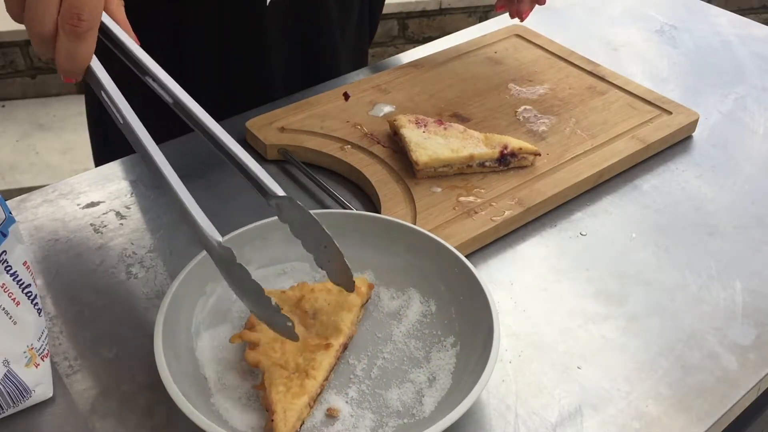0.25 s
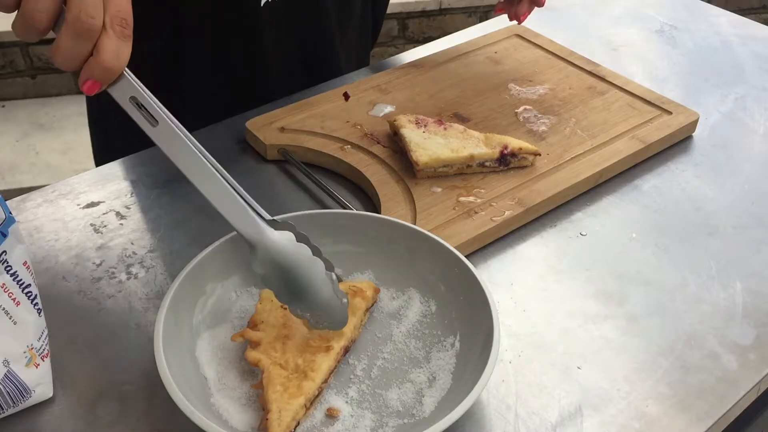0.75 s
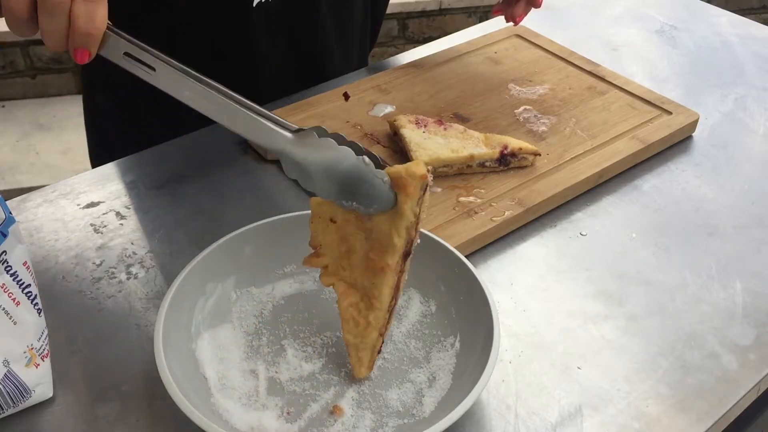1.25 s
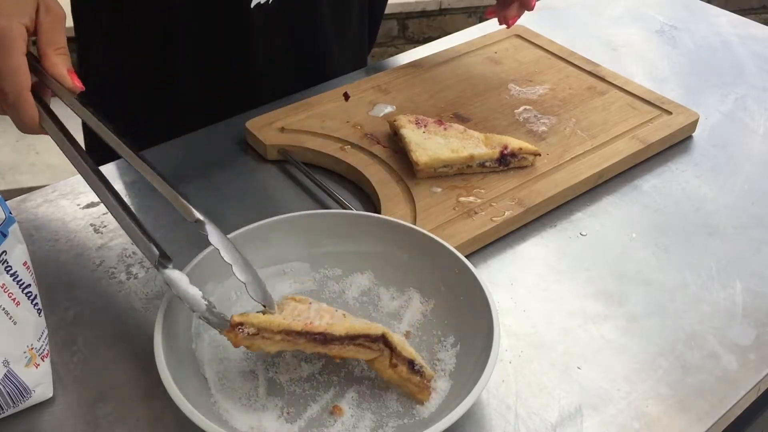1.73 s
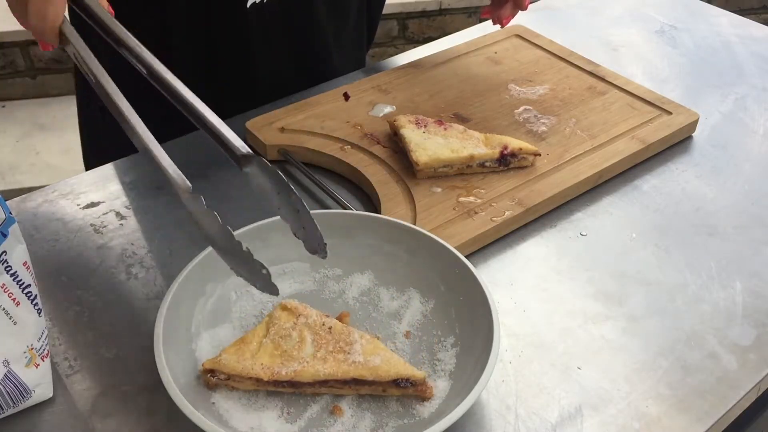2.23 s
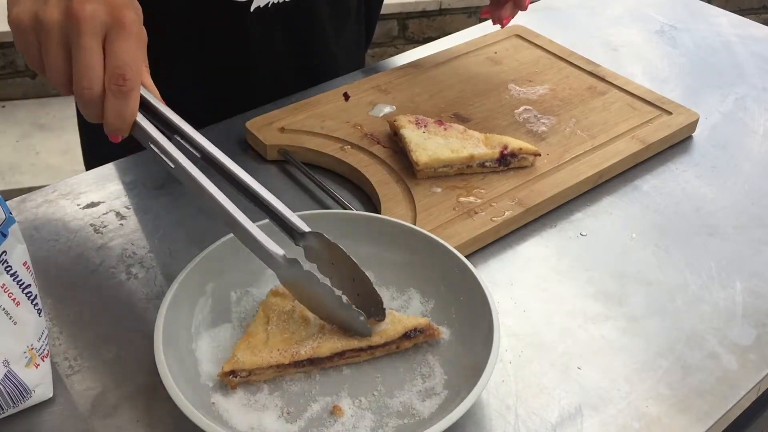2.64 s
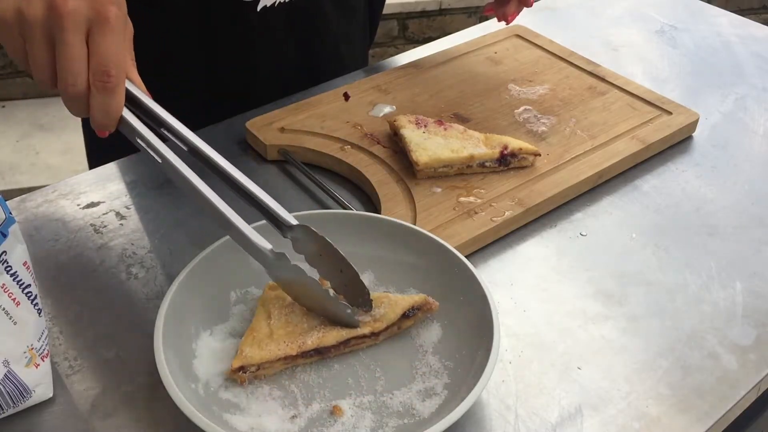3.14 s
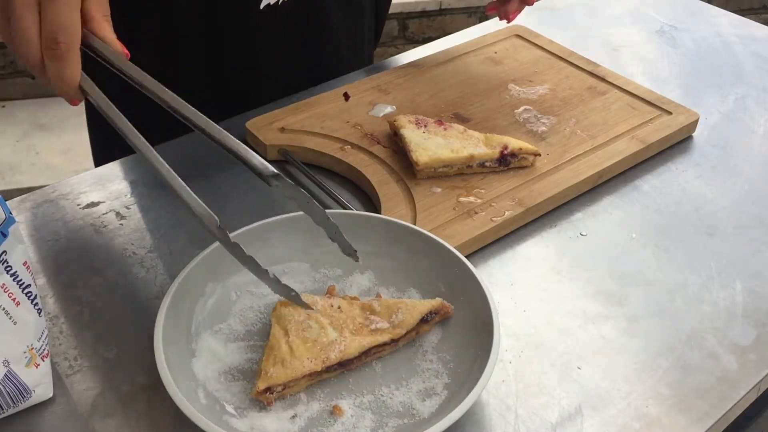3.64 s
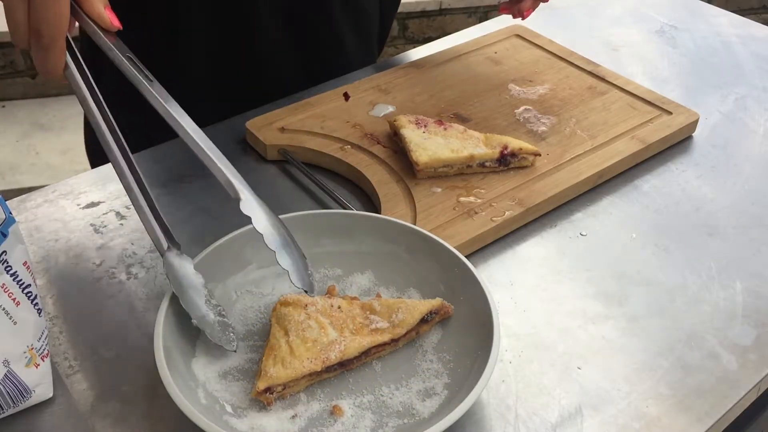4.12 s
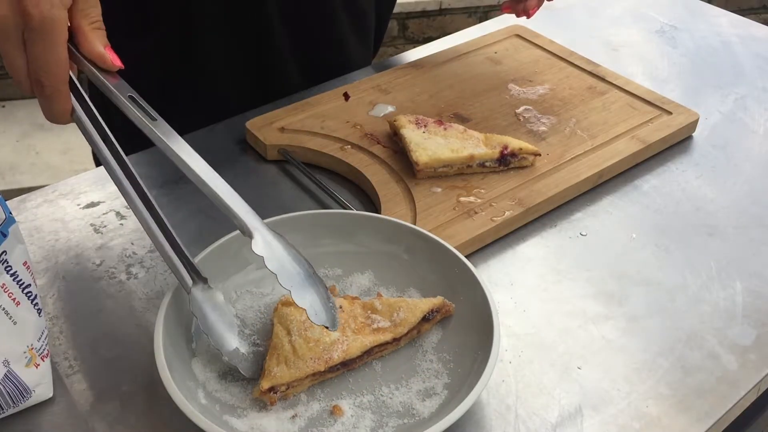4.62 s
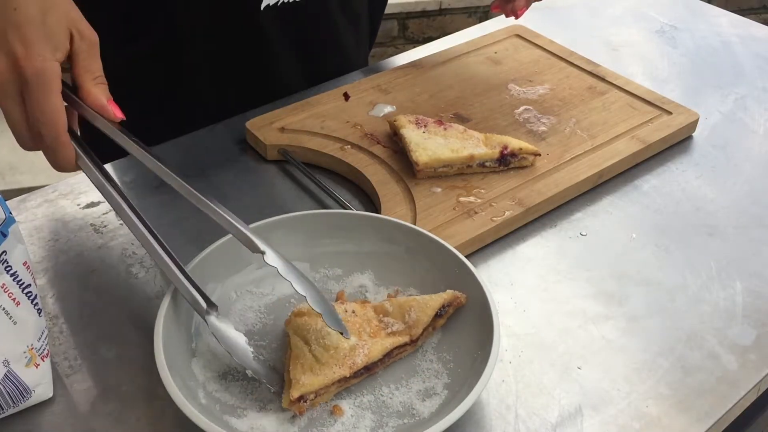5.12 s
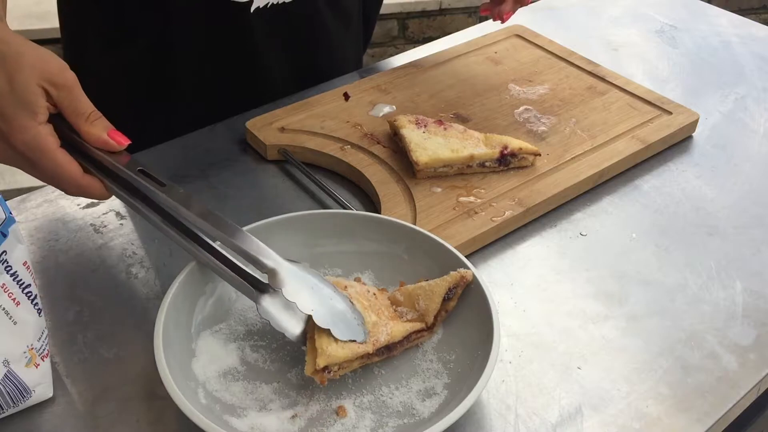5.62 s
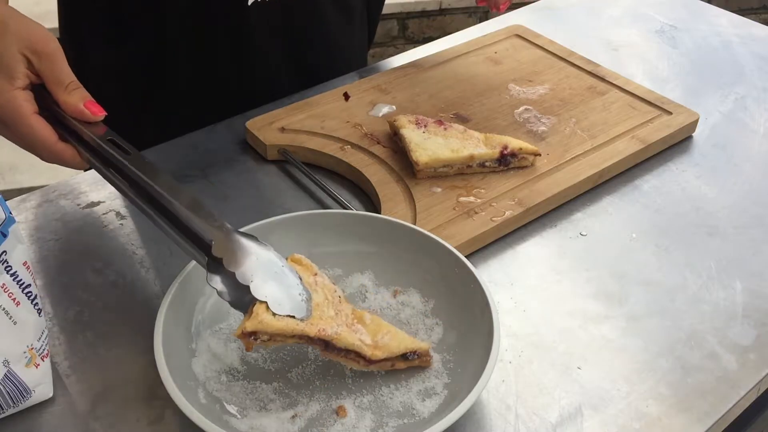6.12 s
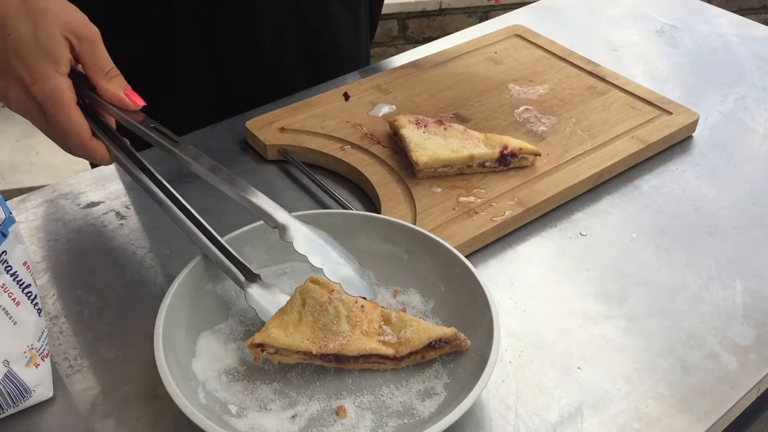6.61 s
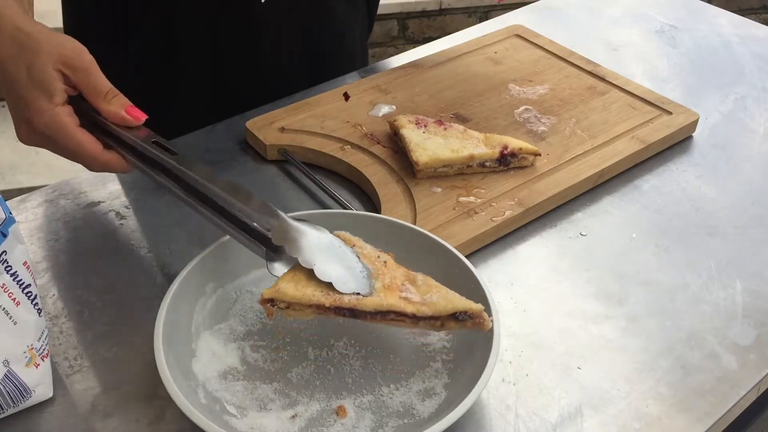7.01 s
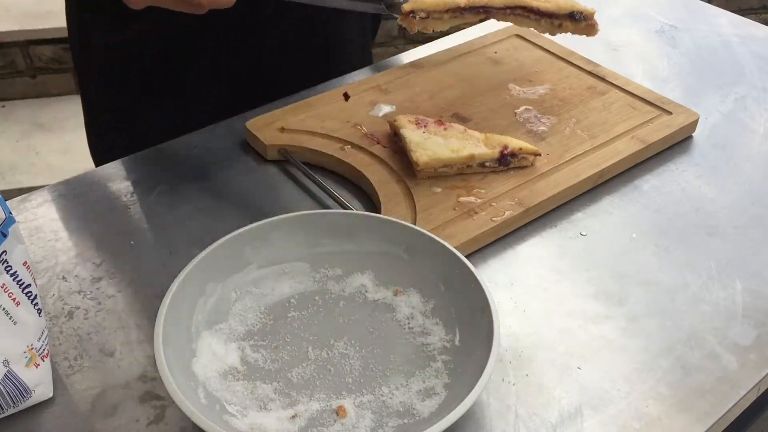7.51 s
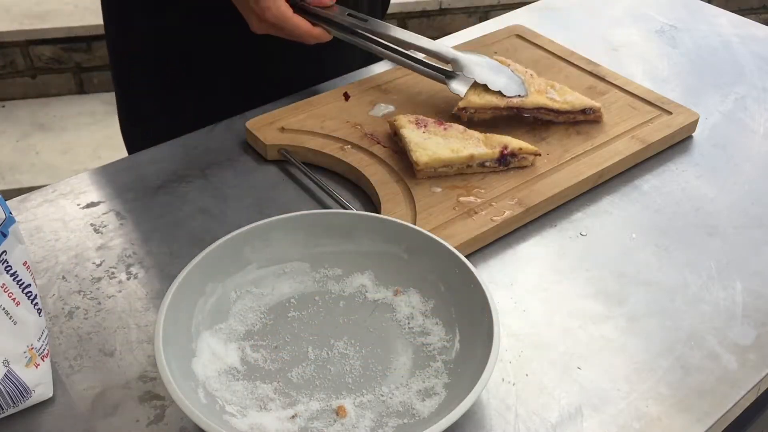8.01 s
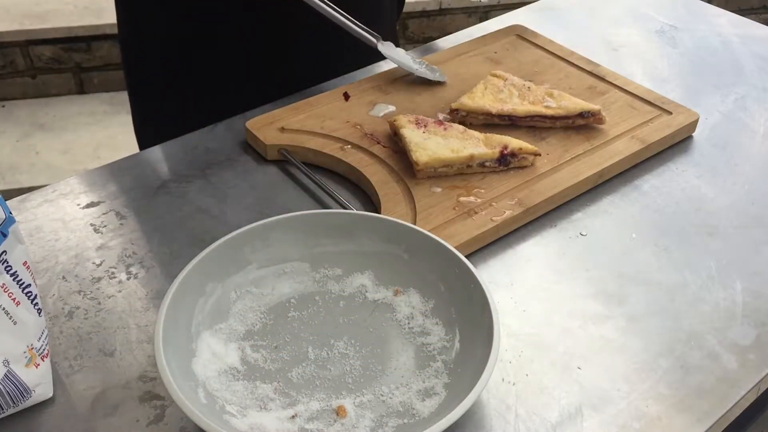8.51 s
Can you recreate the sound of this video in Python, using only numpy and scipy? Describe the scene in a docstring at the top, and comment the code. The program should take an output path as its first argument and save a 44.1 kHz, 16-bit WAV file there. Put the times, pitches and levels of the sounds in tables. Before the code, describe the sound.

Outdoors, with traffic humming far away, a close microphone picks up the soft fizz of sugar and small crackles as fried bread is moved around a ceramic bowl. The steel table bumps dully. Metal tongs clink on the bowl, the bread rubs through the sugar again, and then come gritty scrapes and knocks, ending with a hard clack and scrape heard twice.

```python
"""Close microphone on a ceramic bowl on a sheet-steel table, walls nearby, traffic humming far off.
First fried bread slides through granulated sugar, its crust crackling, and the table booms softly.
Near 2 s steel tongs ring the bowl; a long push through the sugar follows. From 4 s the tongs knock
and scrape the glaze, hardest at 6.4 s, and two faint hoots come from the distance.
From 7.3 s that last stroke loops once more."""
import sys
import numpy as np
from scipy import signal
from scipy.fft import rfft, irfft, next_fast_len
from scipy.io import wavfile
from scipy.ndimage import uniform_filter1d, map_coordinates

SR = 44100
rng = np.random.default_rng(int(sys.argv[2]) if len(sys.argv) > 2 else 0)


def generate_wav(sig):
    """Save sig (samples, or channels by samples) to the path in sys.argv[1] as 16-bit PCM at SR."""
    pcm = np.round(np.clip(np.atleast_2d(sig).T, -1, 1) * 32767).astype(np.int16)
    wavfile.write(sys.argv[1], SR, pcm)


N = 385875

# far traffic (frequency [Hz], spectral level [dB])
TRAFFIC_SPECTRUM = [(13, -50), (22, -12), (81, -5.5), (170, -11), (287, -15.5), (572, -16), (800, -17),
                    (1630, -30), (3000, -34.5), (8000, -37.5), (16200, -47)]
# far engine (frequency [Hz], width [Hz], level [dB])
ENGINE_PEAKS = [(78.6, 7.1, -1.5), (173.6, 7.6, -1), (251.7, 15, -6), (333, 21, -10)]
# far hoots (time [s], level [dB], pitch [Hz], t60 [s])
FAR_HOOTS = [(7.164, -40.5, 812, 0.16), (7.233, -41, 783, 0.13)]
# sheet-steel table top (frequency [Hz], width [Hz], level [dB])
TABLE_MODES = [(126, 7.4, 0.5), (222.6, 13, 4), (304.7, 60, -5.5), (510, 67, -2.5)]
# soft bumps on the table (time [s], level [dB])
TABLE_BUMPS = [(0.306, -26), (0.345, -27), (0.706, -31), (1.431, -31), (2.356, -31.5), (6.975, -36.5),
               (7.12, -36)]
# crust and sugar lumps breaking (time [s], level [dB], band centre [Hz])
CRUST_BREAKS = [(0.333, -45, 2640), (0.7796, -46.5, 5100), (0.902, -44, 3400), (0.913, -50, 3500),
                (0.97, -41, 5660), (1.0395, -48, 4300), (1.09, -48, 3500), (1.122, -36.5, 5820),
                (1.2027, -44, 4230), (1.241, -44.5, 2800), (1.281, -44, 5740), (1.3655, -49, 6960),
                (1.4088, -44, 6800), (1.472, -39.5, 6100), (1.561, -42.5, 4000), (1.6155, -43, 4940),
                (1.63, -33, 4100), (1.639, -26, 5080), (2.4494, -36.5, 6150), (2.4647, -39.5, 8000),
                (2.4986, -40, 9190), (2.8005, -39, 6060), (2.975, -38.5, 6500), (4.3067, -35, 9000),
                (4.3167, -21, 5430), (5.188, -34, 4200), (5.7, -43, 4600), (5.7644, -39.5, 4290),
                (6.321, -48.5, 5330), (6.7994, -38, 9190), (7.0529, -49, 8250), (7.066, -48, 3500),
                (7.21, -56.5, 8130)]
# bread sliding in sugar (peak time [s], level [dB], rise [s], hold [s], fall [s])
BREAD_SLIDES = [(0.0, -45, .01, 0.011, 0.52), (0.257, -57.5, 0.145, .03, 0.033),
                (0.323, -60.5, .03, 0.04, 0.1025), (0.955, -49.5, 0.17, 0.012, 0.21),
                (1.21, -56.5, 0.036, 0.022, 0.24), (1.48, -54.5, 0.068, 0.24, 0.3),
                (2.354, -69, 0.013, .005, 0.038), (2.466, -44, 0.019, 0.0055, 0.18),
                (2.7, -49.5, .35, .88, .15), (2.95, -55, .2, 0.023, .25), (4.335, -54, 0.013, .005, 0.095),
                (4.878, -47, 0.19, 0.0066, 0.012), (5.39, -49, 0.068, 0.076, .01),
                (5.963, -60.5, 0.73, .05, 0.087), (6.374, -56, .012, .005, 0.02),
                (6.93, -69, .02, 0.062, 1)]
# contact noises (frequency [Hz], spectral level [dB])
FIZZ_SPECTRUM = [(710, -72), (1200, -14.5), (1750, -6), (2430, -0.5), (3150, -4.5), (4170, -0.5),
                 (8000, -5), (14700, -18.5), (16000, -32.5)]  # sugar grains
RUB_SPECTRUM = [(120, -25), (250, -17.5), (450, 3.5), (800, -4), (1500, -7), (2400, -29.5)]  # bread on glaze
GRIT_SPECTRUM = [(150, -48), (600, -11.5), (1300, -0.5), (1800, -3.5), (2800, -8.5), (5000, -6),
                 (9000, -17), (16000, -39.5)]  # steel on sugar
CRACK_SPECTRUM = [(300, -34), (1000, -6), (2000, -7), (4500, -4.5), (9000, -3), (12000, -22.5),
                  (16000, -33)]  # first touch of a knock
# bowl modes (frequency [Hz]) and, row for row, (level [dB], free t60 [s])
BOWL_MODE_HZ = [741, 1631, 2746, 4097, 5620, 7330, 9195, 11230]
BOWL_MODES = [(-7.5, 0.19), (-5.5, 0.45), (-9, 0.39), (-18, 0.23), (-22, 0.3), (-20.5, 0.085),
              (-29.5, 0.061), (-31, 0.055)]
# tongs modes (frequency [Hz]) and, row for row, (struck level [dB], free t60 [s], rubbed level [dB])
TONGS_MODE_HZ = [1066, 1560, 1900, 2190, 2425, 2492, 2575, 2830, 3320, 3470, 4130, 4170, 4215, 5310, 5790,
                 6090, 6380, 7360, 8230, 9230, 11290, 13500]
TONGS_MODES = [(-5, 0.22, -9.5), (3.5, 0.1, -9), (2.5, 0.05, -2), (-14.5, 0.055, -3), (-1, 0.088, 1.5),
               (-2, 0.076, -3), (-15, 0.058, -4.5), (-4.5, 0.089, -1.5), (-9, 0.027, -5),
               (-13.5, 0.15, -15.5), (0.5, 0.1, 13.5), (10, 0.042, -4.5), (-14, 0.027, -12.5),
               (-19, 0.07, -20), (-1, 0.043, -7.5), (-18, 0.054, -14), (-16, .1, -17.5), (-22.5, 0.14, 4.5),
               (-18.5, 0.046, -11), (-8.5, 0.12, -1.5), (-22.5, 0.075, -10.5), (-37.5, .15, -15)]
# tong tips dragged on the glaze (peak time [s], level [dB], rise [s], fall [s],
# then relative to that level: bowl [dB], steel at 3.8-7 kHz [dB], steel above 7 kHz [dB])
TIP_DRAGS = [(1.888, -46, 0.0059, 0.033, 14, -9, -10), (1.96, -49, 0.041, 0.17, 4, -17, -4),
             (2.05, -48, 0.12, 0.22, -11, -11, -12), (4.03, -58, .01, .04, -17, 7, -9),
             (4.104, -41, 0.048, 0.019, -9, -6, -4.5), (4.18, -48, 0.078, .06, -8, -2, -6),
             (4.29, -60.5, 0.041, 0.089, 3, 6, -2), (4.872, -34.5, .008, 0.017, -12, -1.5, -5.5),
             (4.93, -46.5, .02, .2, -5, -5, -19), (4.993, -31.5, 0.018, 0.053, -3.5, 1.5, -2.5),
             (5.022, -30.5, .02, .09, -12, -5, -21), (5.125, -34.5, .015, 0.086, -3.5, -11, -24),
             (5.471, -26, 0.0052, 0.091, -7, -7, -24), (5.64, -59.5, 0.13, 0.077, -12, -8, -11),
             (6.399, -31.5, .015, 0.051, -10, -4.5, -27), (6.64, -41, .2, 0.26, -4, -2, -18),
             (6.744, -36.5, 0.14, 0.17, -8, -7, -13), (6.794, -40.5, 0.15, 0.073, -11, -9, -10),
             (6.84, -47, 0.093, 0.069, -10, -12, -17)]
# knocks on the bowl: first the bread's soft thud, then the tongs; the final row is a faint tick
# where the last stroke starts to repeat (time [s], crack [dB], bowl ring [dB], tongs ring [dB],
# thump [dB], bowl freedom [share of free t60], hardness [dB/octave])
BOWL_KNOCKS = [(0.7083, -20.5, -51, -68, -30.5, 1, -6), (1.513, -31, -53, -69.5, -50, 0.7, -4.5),
               (1.7677, -39, -50, -47, -48, 0.7, 1), (1.8772, -14.5, -9.5, -44, -26.5, 0.14, 7),
               (2.0023, -30, -27.5, -50, -47, 0.7, 6), (2.0384, -24.5, -24.5, -62.5, -55, 1, 4.5),
               (2.0745, -23.5, -19, -56.5, -55, 0.85, 6.5), (2.0879, -21, -39.5, -52, -45, 0.53, -6.5),
               (2.1061, -36, -31.5, -65.5, -40.5, 0.6, 8.5), (4.0087, -19.5, -12, -28, -33, 0.1, 8),
               (4.0254, -44.5, -64, -37.5, -63, 0.4, 6), (4.3207, -60, -19, -60, -68, 0.75, 7),
               (4.9008, -14.5, -49, -22, -37.5, 0.9, 8), (5.0163, -26, -33, -29, -37, 0.8, 6),
               (5.1621, -37, -26.5, -59.5, -41, 0.87, 2), (5.4618, -11.5, -10, -19.5, -30.5, 0.08, 5),
               (5.7326, -30, -36, -29, -37.5, 1, 1), (6.3784, 0.5, -48, -10, -20.5, 0.67, 7),
               (6.8811, -48.5, -44, -39, -42.5, 1, -1), (7.312, -62, -58, -67, -66, 0.9, 0)]


def amp(db):
    """Gain of a level in dB."""
    return 10 ** (np.asarray(db) / 20)


def unit(x):
    """x at rms 1."""
    return x / np.sqrt(np.mean(x ** 2) + 1e-20)


def filtered(x, response):
    """x through a complex frequency response."""
    size = next_fast_len(len(x) + 8192)
    return irfft(rfft(x, size) * response(np.fft.rfftfreq(size, 1 / SR)), size)[:len(x)]


def noise(length, response):
    """Filtered noise at rms 1."""
    return unit(filtered(rng.standard_normal(length), response))


def colour(points):
    """Response through (frequency [Hz], level [dB]) points on a log axis."""
    freqs, db = np.transpose(points)
    return lambda hz: amp(np.interp(np.log(hz + 1), np.log(freqs + 1), db))


def resonances(peaks):
    """Causal response of (frequency [Hz], width [Hz], level [dB]) peaks of alternating sign."""
    return lambda f: sum((-1) ** k * amp(db) * 1j * f * width / (hz * hz - f * f + 1j * f * width)
                         for k, (hz, width, db) in enumerate(peaks))


def wobble(rate):
    """A smooth random curve, rate knots a second."""
    return map_coordinates(rng.standard_normal(int(N * rate / SR) + 4), [np.arange(N) * rate / SR])


def grains(rate, spread_db, clump_db):
    """Tiny impulses of uneven size that come in clumps, rms 1."""
    impulses = (rng.random(N) < rate / SR) * rng.standard_normal(N)
    return unit(impulses * amp(spread_db * rng.exponential(size=N) + clump_db * wobble(60)))


def patchy(x, depth_db):
    """x with soft random swells, each over a part of the spectrum."""
    spectra = signal.stft(x, nperseg=512)[2]
    swells = uniform_filter1d(rng.standard_normal(spectra.shape), size=16, axis=0)
    swells = uniform_filter1d(swells, size=9, axis=1)
    return signal.istft(spectra * amp(depth_db * unit(swells)), nperseg=512)[1][:N]


def stroke(at, db, rise, fall, hold=0):
    """Gain of one stroke: it gains 20 dB in the rise, holds, and loses 20 dB in the fall."""
    t = np.arange(0, N, 16) / SR - at
    gain = amp(db + 20 * np.minimum(0, np.minimum(t / rise, (hold - t) / fall)))
    return np.repeat(gain, 16)[:N]


def add(track, at, sound):
    """Mix a sound into the track at a time in seconds."""
    part = track[round(at * SR):][:len(sound)]
    part += sound[:len(part)]


def tones(events, attack_s):
    """Single damped tones with a soft start."""
    out, t = np.zeros(N), np.arange(SR // 2) / SR
    for at, db, hz, t60 in events:
        add(out, at, amp(db - 60 * t / t60) * (1 - np.exp(-t / attack_s)) * np.sin(2 * np.pi * hz * t))
    return out


def ringing(modes_hz, modes, t, tilt, freedom):
    """Modes set off together at chance phases; a touch (freedom below 1) shortens them all."""
    hz = np.array(modes_hz)[:, None]
    db, t60 = np.transpose(modes)[:, :, None]
    phase = 2 * np.pi * rng.random(hz.shape)
    decay = amp(db + tilt(hz) - 60 * t / (t60 * freedom))
    return np.sum(decay * np.sin(2 * np.pi * hz * t + phase), axis=0)


def street(traffic_db=-52, engine_db=-55):
    """Far off: traffic that swells a little, an engine's unsteady drone and two hoots."""
    traffic = amp(traffic_db + 0.7 * wobble(2.4)) * noise(N, colour(TRAFFIC_SPECTRUM))
    engine = amp(engine_db) * noise(N, resonances(ENGINE_PEAKS))
    return traffic + engine + tones(FAR_HOOTS, attack_s=0.0083)


def yard_echo(near, level_db=-12, t60=0.17):
    """Nearby walls and the table top send a short diffuse answer to the microphone."""
    t = np.arange(SR // 4) / SR
    tail = noise(len(t), colour([(200, 3.0), (4000, -11.5), (14000, -9.5)])) * amp(-60 * t / t60)
    delayed = np.pad(tail / np.linalg.norm(tail), (130, 0))  # 3 ms late
    return amp(level_db) * signal.fftconvolve(near, delayed)[:N]


def table_bumps(hz=115, t60=0.23):
    """Under the bowl, the steel sheet booms softly when bumped."""
    return tones([(at, db, hz, t60) for at, db in TABLE_BUMPS], attack_s=0.0092)


def thump(t, hz=410, width_hz=500, t60=0.058):
    """The loaded bowl answers with a dull burst of noise."""
    return amp(-60 * t / t60) * noise(len(t), resonances([(hz, width_hz, 0)]))


def crunches(t60=0.048, thump_db=-12.5):
    """Crust and sugar lumps break: each a wide band of crackle over a small thump."""
    out, t = np.zeros(N), np.arange(SR // 12) / SR
    # faint chance crackles while the bread is gripped and lifted
    crumbs = [(0.8 + when, -49 + 8 * (size - 0.5), 4450 * 2 ** (1.8 * (pitch - 0.5)))
              for when, size, pitch in rng.random((9, 3)) * [1.05, 1, 1]]
    for at, db, hz in CRUST_BREAKS + crumbs:
        crackle = rng.standard_normal(len(t)) * amp(4 * rng.standard_normal(len(t)))
        band = unit(filtered(crackle, lambda f: resonances([(hz, 0.85 * hz, 0)])(f) ** 2))
        envelope = amp(db - 60 * t / t60) * (1 - np.exp(-t / 0.0013))
        add(out, at, envelope * band + amp(db + thump_db) * thump(t))
    return out


def sugar(rub_db=-4, hum_db=-15):
    """Dense crystals fizz under the bread, with a duller rub below; the bowl hums along faintly."""
    level = sum(stroke(at, db, rise, fall, hold) for at, db, rise, hold, fall in BREAD_SLIDES)
    crystals = patchy(grains(7000, spread_db=1.2, clump_db=1.0), depth_db=2.0)
    fizz = unit(filtered(crystals, colour(FIZZ_SPECTRUM)))
    rub = unit(filtered(grains(2500, spread_db=1.5, clump_db=1.5), colour(RUB_SPECTRUM)))
    t = np.arange(SR // 8) / SR
    bowl = ringing(BOWL_MODE_HZ, BOWL_MODES, t, lambda hz: 3 * np.log2(hz / 3000), freedom=0.22)
    hum = unit(signal.oaconvolve(fizz, bowl)[:N])
    return level * (fizz + amp(rub_db) * rub + amp(hum_db) * hum)


def scrapes(low_steel_db=-5.5, grit_db=-8):
    """Sugar crystals crushed under the steel tips kick tongs and bowl at random."""
    drags = np.array([stroke(*row[:4]) for row in TIP_DRAGS])
    level = drags.sum(axis=0)
    bowl_gain, middle_gain, shimmer_gain = amp(np.array(TIP_DRAGS)[:, 4:].T) @ drags
    kicks = grains(6000, spread_db=2, clump_db=2)
    t, rubbed = np.arange(SR // 4) / SR, np.array(TONGS_MODES)[:, [2, 1]]

    def steel(low_hz, high_hz, freedom):
        """The rubbed tongs ringing within one band."""
        band = lambda hz: -99 * ((hz < low_hz) | (hz > high_hz))
        return ringing(TONGS_MODE_HZ, rubbed, t, band, freedom)

    low = steel(0, 3800, freedom=0.44)
    middle = steel(3800, 7000, freedom=0.4)
    shimmer = steel(7000, SR, freedom=0.95)  # the dragging tip barely damps these
    bowl = ringing(BOWL_MODE_HZ, BOWL_MODES, t, lambda hz: 5 * np.log2(hz / 3000), freedom=0.25)
    parts = [(amp(low_steel_db) * level, low), (middle_gain, middle),
             (shimmer_gain, shimmer), (bowl_gain, bowl)]
    rings = sum(signal.oaconvolve(gain * kicks, body / np.linalg.norm(body))[:N] for gain, body in parts)
    grit = unit(filtered(kicks, colour(GRIT_SPECTRUM)))
    return rings + amp(grit_db) * level * grit


def knocks(crack_t60=0.01, push_db=40.5):
    """Right at the microphone, each knock cracks, rings bowl and tongs and pushes the table."""
    out, pushes, t = np.zeros(N), np.zeros(N), np.arange(SR // 3) / SR
    struck = np.array(TONGS_MODES)[:, :2]
    attack = 1 - np.exp(-t / 0.00077)
    for at, crack_db, bowl_db, tongs_db, thump_db, freedom, hardness in BOWL_KNOCKS:
        tilt = lambda hz: hardness * np.log2(hz / 3000) + 0.52 * rng.standard_normal(hz.shape)
        bowl = amp(bowl_db) * ringing(BOWL_MODE_HZ, BOWL_MODES, t, tilt, freedom)
        tongs = amp(tongs_db) * ringing(TONGS_MODE_HZ, struck, t, tilt, freedom=0.33)  # hand-damped
        crack = amp(crack_db - 60 * t / crack_t60) * noise(len(t), colour(CRACK_SPECTRUM))
        add(out, at, attack * (bowl + tongs + crack + amp(thump_db) * thump(t)))
        pushes[round(at * SR)] = amp(thump_db + push_db)
    return out + filtered(pushes, resonances(TABLE_MODES))


def scene():
    """The bowl up close, its echo, the table beneath and the street far behind, in mono."""
    near = knocks() + scrapes() + sugar() + crunches()
    return (near + yard_echo(near) + table_bumps() + street())[None]


def record(dry, bass_hz=35, top_hz=16300):
    """The microphone drops deep bass, the hardest blow clips, the last stroke loops; the top is cut."""
    thinned = filtered(dry[0], lambda hz: (1j * hz / (bass_hz + 1j * hz)) ** 2)
    clipped = thinned / (1 + np.abs(thinned) ** 6) ** (1 / 6)
    loop_at, loop_from = 322631, 257150  # samples: from 7.32 s back to 5.83 s
    looped = np.concatenate([clipped[:loop_at], clipped[loop_from:]])[:N]
    return np.clip(filtered(looped, lambda hz: hz < top_hz), -1, 1)[None]


dry = scene()
out = record(dry)
generate_wav(out)
```